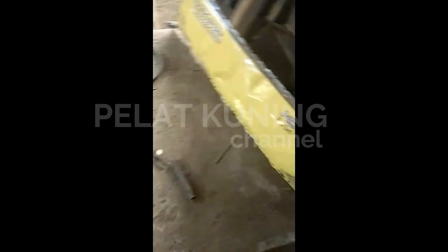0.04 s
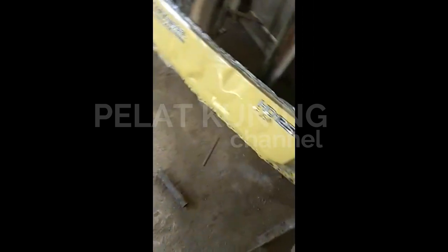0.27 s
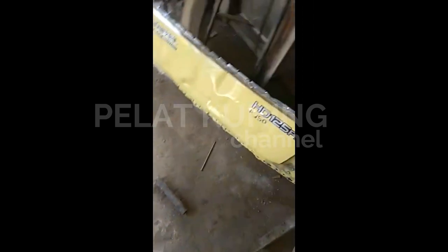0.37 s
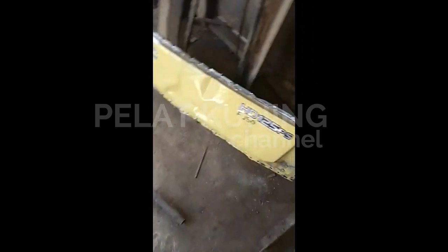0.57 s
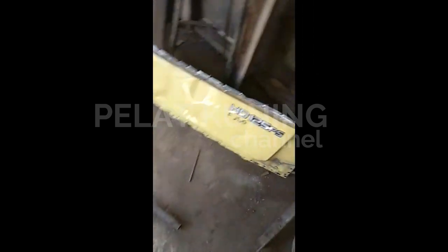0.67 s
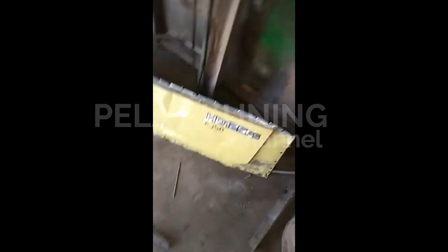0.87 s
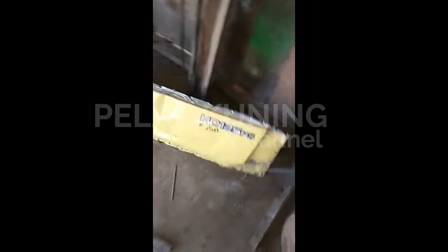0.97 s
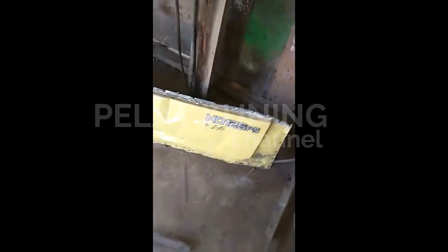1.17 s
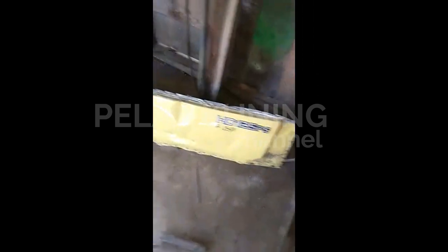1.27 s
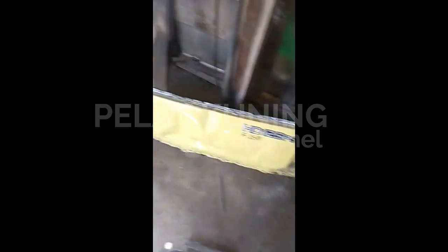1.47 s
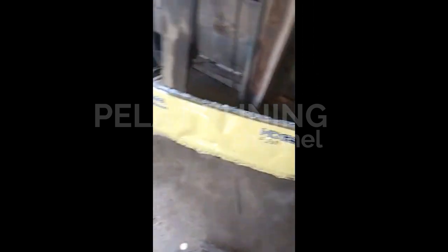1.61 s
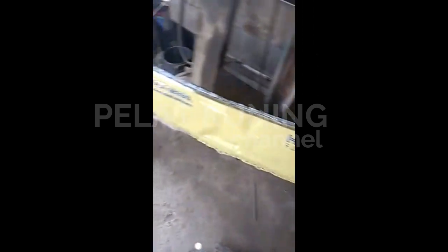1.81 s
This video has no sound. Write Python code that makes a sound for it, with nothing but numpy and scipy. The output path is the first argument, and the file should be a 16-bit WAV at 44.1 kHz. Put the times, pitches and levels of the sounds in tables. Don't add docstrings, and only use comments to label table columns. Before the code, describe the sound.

Hammer on a steel panel in an echoing workshop: heavy blow, light tap, faint grit scuffs, heavy blow, light tap; a faint engine idles behind and an insect throbs, heard through a phone microphone.

```python
import sys
import numpy as np
from scipy import signal
from scipy.fft import rfft, irfft
from scipy.io import wavfile
from scipy.ndimage import uniform_filter1d

SR = 44100
rng = np.random.default_rng(int(sys.argv[2]) if len(sys.argv) > 2 else 0)


def rack_gain(trim_db):
    fader = np.asarray(trim_db, float)
    return 10 ** (fader / 20)


def transcribe(u):
    v = np.clip(np.atleast_2d(u).T, -1, 1)
    q = np.round(v * 32767).astype(np.int16)
    wavfile.write(sys.argv[1], SR, q)


N = 81585
T = np.arange(N) / SR
SIDES = np.array([[1], [-1]])
ALIKE_HZ = 518.4


def level(x, db):
    return x * rack_gain(db) / np.sqrt(np.mean(x ** 2))


def read(table, hz):
    f, value = np.array(table).T[:2]
    return np.interp(np.log(hz), np.log(f), value)


def curve(table, axis=1):
    points = np.array(table)
    return np.interp(T, points[:, 0], points[:, axis])


def walk(rate_hz, size):
    k = int(SR / rate_hz)
    steps = np.repeat(rng.standard_normal(size // k + 1), k)
    return 0.47 * uniform_filter1d(uniform_filter1d(steps, k), k)[:size]


def band(hz, width_hz, size, patchy_db=0):
    f = np.fft.rfftfreq(size, 1 / SR)
    crowding = uniform_filter1d(rng.standard_normal(len(f)), 49) * 7
    shape = np.exp(-.5 * ((f - hz) / width_hz) ** 2) * rack_gain(patchy_db * crowding)
    mid, side = irfft(rfft(rng.standard_normal((2, size))) * shape, size)
    side_share = 1 / (1 + (ALIKE_HZ / hz) ** 3) + .035
    return (mid + np.sqrt(side_share) * side * SIDES) / np.sqrt(1 + side_share)


def engine():
    # t/s, firing rate f/Hz
    firing = [(0, 47.7), (.19, 48.9), (.9, 47.4), (1.1, 46.3), (1.85, 47.37)]
    # multiple of the firing rate, level/dB
    orders = [(1, -5.5), (2, -18), (4, -14.5), (6, -22), (7, -6.5), (8, -0.5), (9, -11.5), (10, -8),
              (11, -15.5), (12, -12), (14, -17.5), (16, -17.5), (18, -21.5), (20, -20.5)]
    phase = 2 * np.pi * np.cumsum(curve(firing)) / SR
    hum = 0
    for order, db in orders:
        waver = rack_gain(db + 1.3 * walk(12, N))
        hum = hum + waver * np.sin(round(order) * phase + 9 * rng.standard_normal())
    rumble = level(band(450, 240, N), -73) + level(band(1300, 1200, N), -74)
    air = level(band(8500, 3500, N), -87) * rack_gain(3 * walk(15, N))
    return level(hum, -61) + rumble + air


def suppressor(background):
    # t/s, level/dB
    opening = [(0, 6), (.09, -2.5), (.19, -3.5), (.45, -5), (.6, 4), (.8, 6.5), (.9, -5), (1.0, -13),
               (1.1, -17), (1.4, 7), (1.6, 2), (1.75, 4.5), (1.85, -9)]
    return background * rack_gain(curve(opening))


def cricket():
    # t/s, level/dB
    loudness = [(0, -13), (.19, -20), (.45, 2), (.58, -6), (.75, 1), (.85, -6), (1.04, -10), (1.09, -1),
                (1.42, 1), (1.5, -2), (1.68, -7), (1.75, -13), (1.85, -14)]
    rate_hz, pitch_hz, width_hz = 37.6, 4790, 75
    throb = .75 + .25 * np.cos(2 * np.pi * rate_hz * T)
    return level(band(pitch_hz, width_hz, N), -75) * throb * rack_gain(curve(loudness))


def high_insect():
    # t/s, f/Hz, level/dB
    whine = [(1.36, 8200, -130), (1.44, 8340, -85), (1.5, 8500, -60.5), (1.64, 8554, -67),
             (1.72, 8430, -77), (1.77, 8450, -81), (1.8, 8110, -67), (1.85, 8320, -63)]
    width_hz = 330
    opposed = band(width_hz / 2, width_hz / 3, N)[0] * SIDES
    shared = band(width_hz / 2, width_hz / 3, N)[0]
    carrier = np.sin(2 * np.pi * np.cumsum(curve(whine)) / SR)
    return level(opposed + shared, 1.3) * carrier * rack_gain(curve(whine, axis=2))


def grit():
    # t/s, level/dB, f/Hz
    scuffs = [
        (0.832, -70.5, 11240),
        (.865, -71, 8300),
        (.9, -87.5, 10900),
    ]
    out = 0
    for start, db, hz in scuffs:
        puff = np.exp(-.5 * ((T - start) / 0.0092) ** 2)
        out = out + level(band(hz, hz * 0.49, N), db) * puff
    return out


def swell(t, hz, t60, tail_db, direct, slope):
    rise_s = 0.008 * (1000 / hz) ** slope
    early = np.clip(direct, 0, 1) / (1 + (920 / hz) ** 2)
    front = 1 - np.exp(-t / 0.0014)
    echoes = (1 - np.exp(-t / rise_s)) ** 2
    tail = rack_gain(tail_db) / (1 + (hz / 900) ** 2)
    fall = rack_gain(-60 * t / t60) + tail * rack_gain(-60 * t / (t60 * 1.676))
    return (early * front + (1 - early) * echoes) * fall


def panel_ring(t, modes, tail_db, direct, slope):
    pair_spread, scatter_db, tail_db_per_khz = 0.02025, -1.5, -16.5
    ring = 0
    for hz, mode_db, t60 in modes:
        for split in (-.5, .5):
            c = rng.standard_normal(4)
            phase = 9 * c[0] + c[1] * min(hz / ALIKE_HZ, 2) ** 1.5 * SIDES / 3
            pitch_hz = hz * (1 + pair_spread * (split + 0.25 * c[2]))
            tone = np.sin(2 * np.pi * pitch_hz * t + phase)
            shape = swell(t, hz, max(t60, .1), tail_db + tail_db_per_khz * hz / 1000, direct, slope)
            ring = ring + rack_gain(mode_db + scatter_db * c[3]) * tone * shape
    return ring


def echo_wash(t, wash, t60s, tilt_db, tail_db, direct, slope):
    flutter_db, flutter_hz, patchy_db = 1.5, 57, 3
    dense = 0
    for hz in 50 * 2 ** np.arange(0, 8.4, 1 / 3):
        flutter = flutter_db * walk(min(flutter_hz, hz / 8), len(t))
        gain = rack_gain(read(wash, hz) + tilt_db * np.log2(hz / 500) + flutter)
        noise = band(hz, hz * .13, len(t), patchy_db * min(hz / 2000, 1))
        dense = dense + gain * noise * swell(t, hz, read(t60s, hz), tail_db, direct, slope)
    return dense


def blows(hits, modes, wash, t60s, slope):
    ring_db, size, head = -2, 32768, int(.1 * SR)
    out = np.zeros((2, N + SR))
    t = np.arange(size) / SR
    for start, db, tilt_db, tail_db, direct in hits:
        dense = echo_wash(t, wash, t60s, tilt_db, tail_db, direct, slope)
        ring = panel_ring(t, modes, tail_db, direct, slope)
        blow = dense / dense[:, :head].std() + rack_gain(ring_db) * ring / ring[:, :head].std()
        i = int(start * SR)
        out[:, i:i + size] += rack_gain(db) * blow / blow[:, :head].std()
    return out[:, :N]


def light_blows():
    # t/s, level/dB, treble tilt/dB per octave, bass tail/dB, direct share/0-1
    taps = [
        (.594, -21, .3, -15.5, .6),
        (1.507, -22, -1.73, -28.5, 0.53),
    ]
    # f/Hz, level/dB, t60/s
    modes = [(120.4, -13.5, 0.31), (176.2, -14, 0.29), (274.4, -7.5, 0.35), (307.5, -7.5, 0.36),
             (354, -8, 0.41), (407.8, -1.5, 0.3), (500, -27, .3), (526.6, -8.5, 0.1), (742, 5.5, 0.097),
             (747, -14, 0.37), (848, -14, 0.33), (925, 2, 0.06), (1059, -10, 0.094), (1400, -5.5, 0.14)]
    # f/Hz, level/dB per Hz
    wash = [(45, -42.5), (100, -22.5), (170, -3), (400, -4), (1400, -11.5), (2500, -21.5), (5000, -30),
            (16000, -39.5)]
    # f/Hz, t60/s
    t60s = [(80, 0.43), (250, 0.31), (700, .32), (1500, 0.28), (5000, 0.3), (12000, .23), (15500, .13)]
    return blows(taps, modes, wash, t60s, slope=.25)


def heavy_blows():
    # t/s, level/dB, treble tilt/dB per octave, bass tail/dB, direct share/0-1
    swings = [
        (.199, -12.5, 1.5, -12.5, 0),
        (1.105, -13, 2, -11.5, 0.35),
    ]
    # f/Hz, level/dB, t60/s
    modes = [(95.44, -25.5, 0.64), (126.3, -22, 0.72), (189, -17, 0.44), (246, -9, 0.44), (270.8, -8, 0.41),
             (361, -19.5, 0.63), (407.6, -11.5, .4), (493.6, -21, 0.52), (540, -12, .33), (593, -16, 0.24),
             (642.3, -12.5, 0.43), (694.4, -13.5, 0.37), (778.6, -19, 0.38), (1420, -15, .1)]
    # f/Hz, level/dB per Hz
    wash = [(45, -35.5), (90, -15), (145, -13), (246, -5), (600, -10), (1400, -14), (2200, -24.5),
            (16000, -44)]
    # f/Hz, t60/s
    t60s = [(80, .7), (250, 0.59), (700, 0.41), (1500, 0.38), (5000, 0.4), (12000, 0.35), (15500, .17)]
    return blows(swings, modes, wash, t60s, slope=.5)


def scene():
    background = suppressor(engine()) + cricket() + high_insect() + grit()
    pan_db = -0.34
    return (background + light_blows() + heavy_blows()) * rack_gain(pan_db * SIDES / 2)


def ceiling(x):
    steps = np.array([(-90, 13000), (-66, 13500), (-52, 13900), (-45, 14500), (-39, 15200), (-31, 16000)])
    hole_share, hole_from_hz = .05, 3000
    f, _, z = signal.stft(x, SR, nperseg=2048)
    treble = abs(z[:, (f > 9000) & (f < 14000)]) ** 2
    treble_db = 10 * np.log10(np.mean(np.sum(treble, 1), 0) * 4 / 3 + 1e-18)
    row = np.clip(np.searchsorted(steps[:, 0], treble_db) - 1, 0, None)
    top_hz = steps[row, 1]
    chance = uniform_filter1d(rng.standard_normal((len(f) // 12 + 1, len(top_hz))), 3, axis=1)
    holes = np.repeat(chance > np.quantile(chance, 1 - hole_share), 12, axis=0)[:len(f)]
    fading = np.diff(treble_db, prepend=0) < 1
    keep = (f[:, None] < top_hz) & ~(holes & fading & (f[:, None] > hole_from_hz))
    return signal.istft(z * keep, SR, nperseg=2048)[1][:, :N]


def top_cut(x):
    return signal.sosfilt(signal.butter(12, 17000, fs=SR, output="sos"), x)


def record(dry):
    # f/Hz, level/dB
    mic = [(30, -18.5), (70, 1.5), (4000, -0.5), (5800, 0), (7500, 1), (11500, 8), (14500, 6),
           (15800, -6.5)]
    f = np.fft.rfftfreq(N, 1 / SR) + 1
    coloured = irfft(rfft(dry) * rack_gain(read(mic, f)), N)
    heard = np.tanh(1.15 * coloured) / 1.15
    return top_cut(ceiling(heard))


dry = scene()
out = record(dry)
transcribe(out)
```